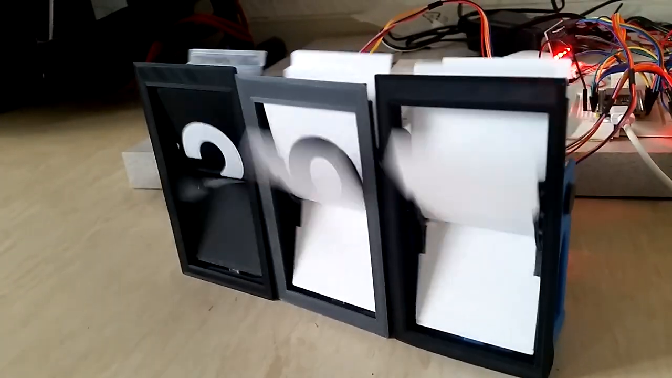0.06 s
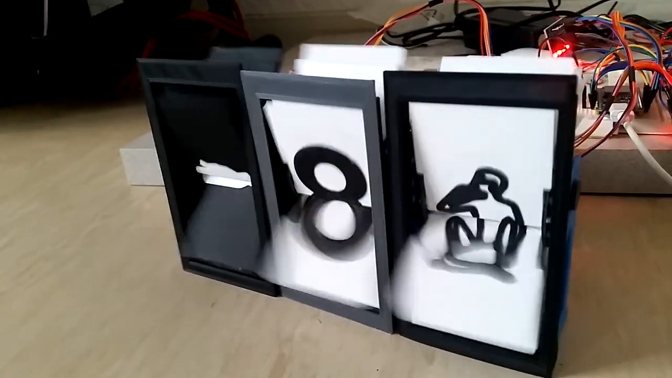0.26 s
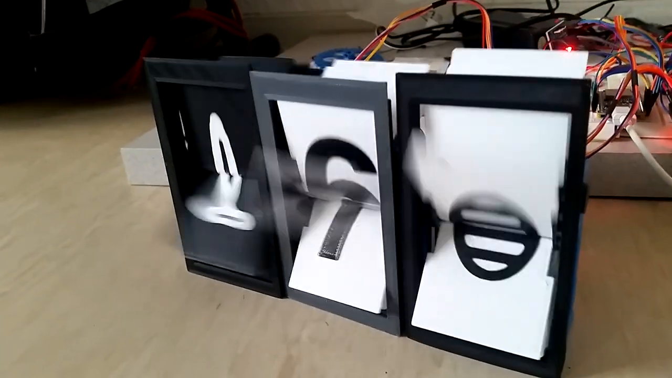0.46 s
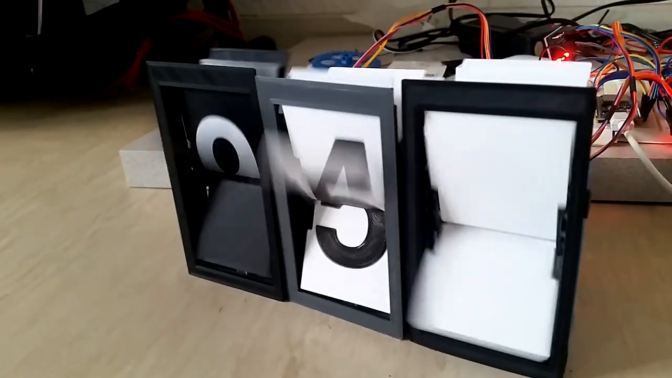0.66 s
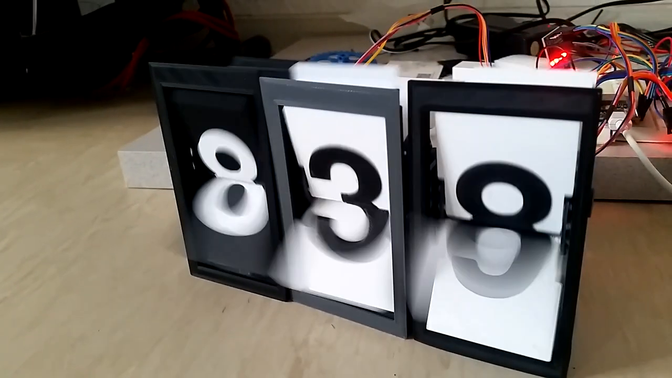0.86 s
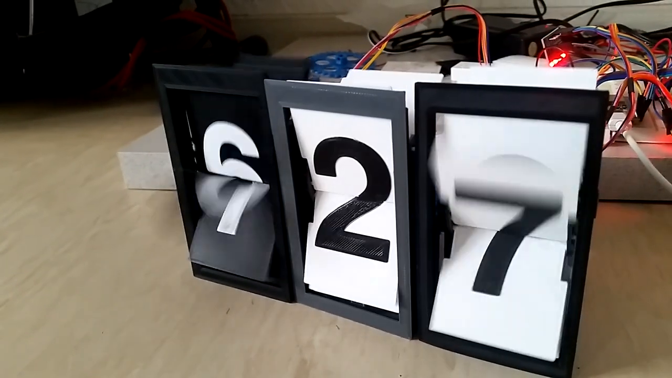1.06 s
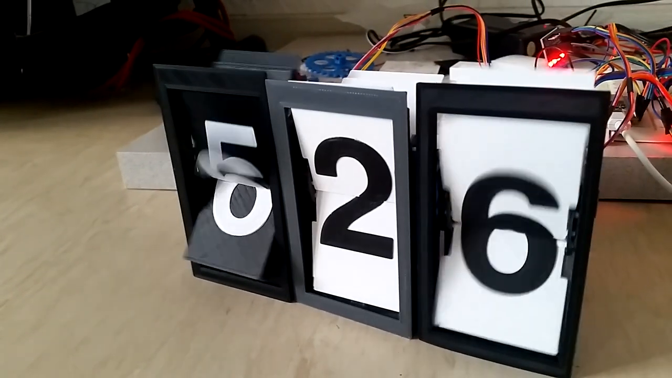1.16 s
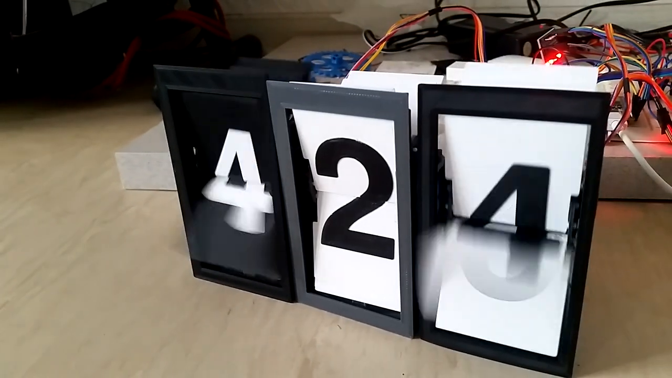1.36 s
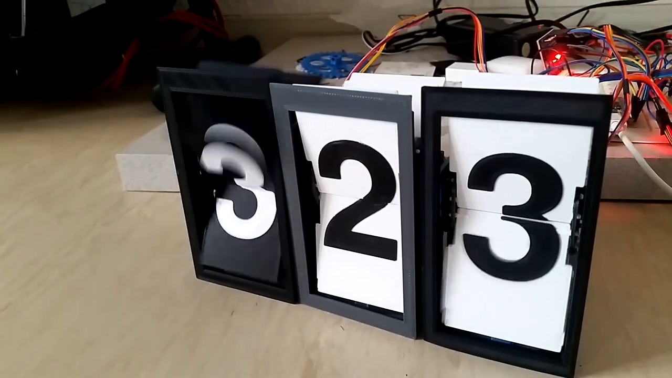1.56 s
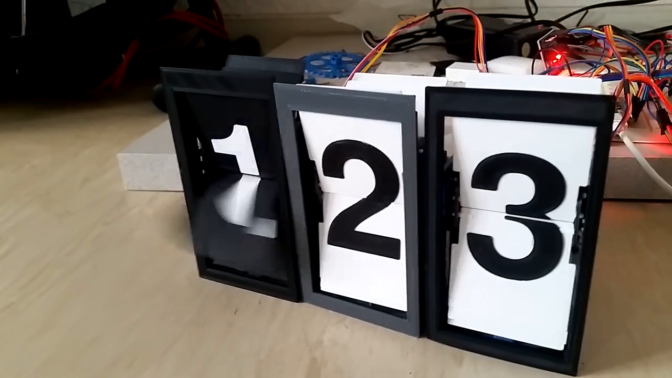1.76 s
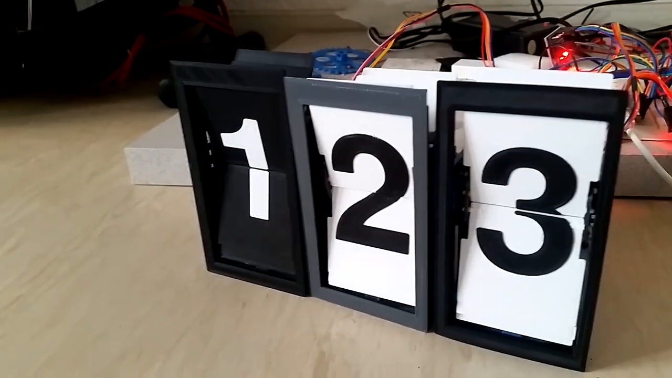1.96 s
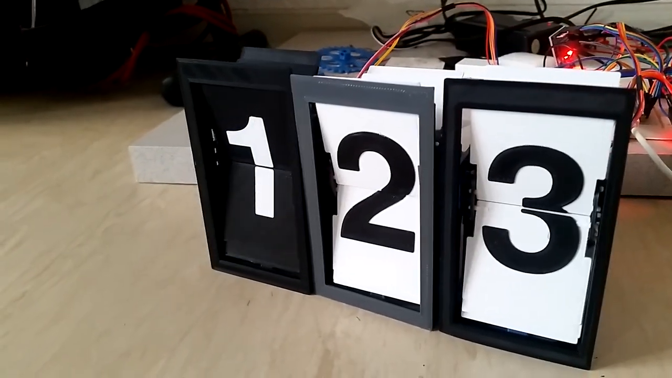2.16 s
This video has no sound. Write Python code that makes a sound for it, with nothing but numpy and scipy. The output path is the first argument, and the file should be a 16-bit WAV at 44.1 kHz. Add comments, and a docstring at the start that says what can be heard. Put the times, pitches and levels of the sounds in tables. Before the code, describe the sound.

Plastic split-flap display drums clatter rapidly, crisp flaps slapping over, thinning to a last few clicks

```python
"""A small room with a table, on which three small split-flap drums spin; their contacts grow weaker.
Flap edges rub past the catches as noise shaped by many tiny random slips. Ticks and slaps are noise bursts
with a sharp attack, a few milliseconds or less of uneven chatter and a quick decay, ringing in the plastic frame.
Each slap adds a low thump. Decaying noise gives the room's echoes, over a faint hum and air noise."""
import sys
import numpy as np
from scipy import signal
from scipy.fft import rfft, irfft
from scipy.io import wavfile

SR = 44100
rng = np.random.default_rng(int(sys.argv[2]) if len(sys.argv) > 2 else 0)


def unload_audio(sound):
    """Save the sound as a 16-bit wav file, at the path given as the first command line argument."""
    columns = np.transpose(np.atleast_2d(sound))
    # keep every value between -1 and 1, then stretch to whole-number steps
    steps = np.round(np.clip(columns, -1, 1) * 32767)
    wavfile.write(sys.argv[1], SR, steps.astype(np.int16))


N = 97020
TIME = np.arange(N) / SR
CONTACT_SAMPLES = 4096
LEAD_S = 0.012  # room ahead of the first touch in each contact sound


def from_db(db):
    """Decibels to gain."""
    return 10 ** (np.asarray(db) / 20)


def colour(x, points):
    """Causal (minimum-phase) filter through the given (Hz, dB) points, built by folding the cepstrum."""
    size = 8192
    hz, db = np.transpose(points)
    freqs = np.maximum(np.arange(size // 2 + 1) * SR / size, 1)
    gain = from_db(np.interp(np.log(freqs), np.log(hz), db))
    cepstrum = irfft(np.log(gain))
    fold = np.r_[1, np.full(size // 2 - 1, 2), 1, np.zeros(size // 2 - 1)]
    impulse = irfft(np.exp(rfft(cepstrum * fold)))
    return signal.fftconvolve(x, impulse)[:N]


def edge(x, hz, kind):
    """Gentle first-order low- or high-pass."""
    sos = signal.butter(1, min(hz, SR / 2 - 1000), kind, fs=SR, output="sos")
    return signal.sosfilt(sos, x + 1e-18)


def tint(x, low_db, treble_db):
    """Shelves on the low mids and the treble, by adding or removing a filtered copy."""
    low_mid_hz, treble_hz = 3000, 7000
    x = x + (from_db(low_db) - 1) * edge(x, low_mid_hz, "low")
    return x + (from_db(treble_db) - 1) * edge(x, treble_hz, "high")


def wobble(count, per_s):
    """Random curve joining per_s normal random points a second, each of spread 1."""
    at = np.arange(count) * per_s / SR
    return np.interp(at, np.arange(count), rng.standard_normal(count))


def spread(pair, width_db=0):
    """Two unrelated signals become left and right: alike in the bass, apart in the treble."""
    # stereo width of diffuse sound: pitch_hz [Hz], side_minus_mid_db [dB]
    widths = [(100, -23), (500, -22), (2000, -7), (4500, -3.5), (7000, -7.5)]
    mid_points = [(hz, -10 * np.log10(1 + from_db(db + width_db) ** 2)) for hz, db in widths]
    side_points = [(hz, -10 * np.log10(1 + from_db(-db - width_db) ** 2)) for hz, db in widths]
    mid = colour(pair[0], mid_points)
    side = colour(pair[1], side_points)
    return np.array([mid + side, mid - side])


def add(out, start_s, sound):
    """Mix a sound in at a time."""
    start = max(int(start_s * SR), 0)
    out[:, start:start + sound.shape[1]] += sound[:, :N - start]


def background():
    """A steady low sine of wavering level, and coloured noise for the air of the room."""
    # spectrum of the room air: pitch_hz [Hz], level_db [dB, relative]
    air_spectrum = [(25, -3.5), (45, 0), (110, -8), (190, -17), (1000, -29.5), (15000, -44)]
    hum_hz, hum_db, hum_waver_db, air_db = 104.3, -66, 4, -34.5
    hum_level = from_db(hum_db + hum_waver_db * wobble(N, per_s=21))
    hum = hum_level * np.sqrt(2) * np.sin(2 * np.pi * hum_hz * TIME)
    air = spread([colour(side, air_spectrum) for side in rng.standard_normal((2, N))])
    return hum + from_db(air_db) * air


def rubbing():
    """Flap edges scrape past the catches: each tiny slip is a decaying grain of noise, over a steady hiss."""
    # loudness of the rubbing: start_s [s], level_db [dB, before the trim below]
    rub_levels = [(0, -25), (.04, -40.5), (.07, -36), (.085, -30), (.13, -34), (.18, -38), (.22, -37),
                  (.31, -29), (.45, -28.5), (.70, -30), (.94, -31), (1.09, -26.5), (1.15, -34.5),
                  (1.31, -33.5), (1.45, -33), (1.54, -40.5), (1.61, -25), (1.73, -35), (1.84, -42),
                  (1.97, -65), (2.04, -35), (2.07, -68), (2.2, -84)]
    trim_db, treble_db, low_cut_hz = 1, -16.5, 56
    slips_per_s, slip_spread_db, hiss_db, grain_t60_s = 650, 3.8, -5.5, 0.006
    slip_happens = rng.random(N) < slips_per_s / SR
    slips = slip_happens * from_db(slip_spread_db * np.minimum(rng.exponential(1, N), 3.5))
    # the grains add up as power, so 60 dB of decay is a factor of a million
    power_decay = from_db(-120 / (grain_t60_s * SR))
    power = signal.lfilter([1], [1, -power_decay], slips ** 2 + 1e-18)
    grain = np.sqrt(power / power.mean() + from_db(hiss_db) ** 2)
    level = from_db(np.interp(TIME, *np.transpose(rub_levels)) + trim_db)
    noise = level * grain * rng.standard_normal((2, N))
    return edge(tint(noise, 0, treble_db), low_cut_hz, "high")


def resonate(x, hz, width_hz, lift_db):
    """A two-pole resonance lifts a narrow band so that it rings."""
    r = np.exp(-np.pi * width_hz / SR)
    numerator = (1 - r * r) / 2 * np.array([1, 0, -1])
    denominator = [1, -2 * r * np.cos(2 * np.pi * hz / SR), r * r]
    band = signal.lfilter(numerator, denominator, x)
    return x + (from_db(lift_db) - 1) * band


def frame(x, share):
    """Flap and frame ring together, randomly detuned on every call; share scales the dB lifts."""
    # resonances of flaps and frame: pitch_hz [Hz, before detuning], width_hz [Hz], lift_db [dB at full share]
    resonances = [(2717, 490, 5), (4220, 290, 7.5), (5260, 140, 5.5), (5670, 250, 2), (8350, 280, 7),
                  (11130, 380, 4.5)]
    detune = 0.03  # spread as a fraction of the pitch
    for hz, width_hz, lift_db in resonances:
        x = resonate(x, hz * (1 + detune * rng.standard_normal()), width_hz, share * lift_db)
    return x


def contact(chatter_s, t60_s, brush):
    """Plastic hits plastic: optional soft brush, sharp touch, uneven chatter, quick decay and a quiver."""
    attack_s, snap_db, snap_s = 0.0001, -3, 0.0006
    flutter_db, flutter_t60_s, brush_s = -13, 0.087, 0.007
    chatter_rough_db, low_cut_hz = 3.2, 330
    t = TIME[:CONTACT_SAMPLES] - LEAD_S
    # the chatter holds its level for chatter_s, then decays; the snap stresses the first touch
    decay = from_db(-60 * np.maximum(t - chatter_s, 0) / t60_s)
    decay = decay * (1 + from_db(snap_db) * np.exp(-abs(t) / snap_s))
    flutter = from_db(flutter_db - 60 * t / flutter_t60_s)
    shape = np.clip(t / attack_s, 0, 1) * np.hypot(decay, flutter)
    # brushing swells up to the touch and fades after it
    shape = shape + brush * np.exp(-abs(t) / brush_s)
    roughness = from_db(chatter_rough_db * wobble(len(t), per_s=914))
    burst = shape * roughness * rng.uniform(-1.06, 1, (2, len(t)))
    # give each side the energy of the shape
    burst = burst * np.sqrt(np.sum(shape ** 2) / np.sum(burst ** 2, axis=1, keepdims=True))
    return frame(edge(burst, low_cut_hz, "high"), 1)


def place(pair):
    """A direct contact is narrower than the room and reaches the left slightly late, by a random lag."""
    narrower_db, longest_lag_us = -4, 34
    left, right = spread(pair, narrower_db)
    hz = np.fft.rfftfreq(len(left), 1 / SR)
    lag_us = rng.uniform(0, longest_lag_us)
    late_left = irfft(rfft(left) * np.exp(-2j * np.pi * hz * lag_us / 1e6), len(left))
    return np.array([late_left, right])


def ticks():
    """A flap slips off its catch or rebounds: a short, light contact with no brushing."""
    # ticks: start_s [s], level_db [dB, before the trim below]
    tick_times = [(.0751, -24.5), (.2063, -23), (.2224, -20.5), (.2702, -20), (.3211, -14), (.3445, -17),
                  (.4812, -19), (.5550, -15), (.6050, -15), (.6185, -15), (.6284, -16.5), (.6868, -20),
                  (.7024, -22), (.7829, -21), (.8573, -21), (.9125, -20), (.9821, -20), (1.0402, -13),
                  (1.0535, -24), (1.1711, -24), (1.2215, -20), (1.2993, -20.5), (1.3603, -21),
                  (1.3764, -18.5), (1.4149, -23), (1.4429, -23), (1.4806, -22.5), (1.5517, -19.5),
                  (1.6041, -24), (1.6470, -14.5), (1.6789, -25), (1.8525, -25), (1.9854, -26),
                  (2.0210, -28.5), (2.0255, -34), (2.0912, -49), (2.1126, -45)]
    trim_db, chatter_s, t60_s = 3.5, 0.00023, 0.012
    out = np.zeros((2, N))
    for start_s, level_db in tick_times:
        tick = tint(contact(chatter_s, t60_s, 0), low_db=-7.5, treble_db=-1.5)
        add(out, start_s - LEAD_S, from_db(level_db + trim_db) * place(tick))
    return out


def thump():
    """The low push of a landing flap on the light frame: one smooth pulse."""
    level_db, peak_s, low_cut_hz = -18, 0.0014, 60
    t = np.maximum(TIME[:CONTACT_SAMPLES] - LEAD_S, 0) / peak_s
    pulse = t * np.exp(1 - t)
    return from_db(level_db) * edge(pulse, low_cut_hz, "high")[None]


def slaps():
    """Flaps land on the stack: a brushing, chattering contact with the flap's own ring, plus a thump."""
    # slaps: start_s [s], level_db [dB, thump and untrimmed slap], chatter_s [s],
    # low_mid_db [dB], treble_db [dB], ring_hz [Hz, the flap's own ring]
    landings = [(0.2099, -11, 0.00062, -0.5, -.5, 2390), (0.2339, -12, 0.0044, -0.5, -3.5, 4220),
                (0.254, -5.5, 0.001, -5.5, -2.5, 5400), (0.3365, -7.5, 0.00062, -6, 0.5, 10400),
                (0.363, -15, 0.0044, -4, 7, 3940), (0.3734, -11, 0.0041, -3.5, 7, 8600),
                (0.469, -6, 0.00052, -2.5, -3, 4140), (.492, -6.5, 0.0019, -7, -5.5, 5100),
                (0.4977, -7.5, 0.0015, -7.5, 1.5, 4100), (0.5687, -13, 0.0076, -1.5, 7, 4270),
                (.612, -11.5, 0.0032, -2.5, 4, 4000), (0.6504, -6.5, 0.0027, -20, 0, 5210),
                (0.7284, -8, 0.0032, -8, -1.5, 2800), (.744, -7, 0.00062, -4, 2, 4070),
                (0.7687, -10.5, 0.00069, 0, 3, 11800), (.8237, -13.5, .0002, -1, 6.5, 9000),
                (.8325, -12, 0.011, -2.5, 2, 4970), (0.8854, -7.5, 0.0038, -16, -13, 4180),
                (0.9624, -10.5, 0.00067, 1, -6, 3250), (0.9671, -12.5, 0.0052, -1, 4, 5800),
                (0.9985, -8.5, 0.0017, -4.5, 1.5, 10200), (1.078, -14, 0.011, -7, -1, 4500),
                (1.102, -9.5, 0.0052, -4, 2.5, 2610), (1.123, -11.5, 0.0051, -5, 0, 13330),
                (1.1975, -12, 0.01, -6.5, 0, 8400), (1.2546, -10, 0.00099, 3, 0.5, 8900),
                (1.3277, -13, 0.0065, -5.5, -3, 5150), (1.3876, -9, 0.003, -6, 2.5, 12000),
                (1.4634, -10.5, .0013, -0.5, 0.5, 5300), (1.501, -16, 0.003, 1, 0.5, 12080),
                (1.619, -11.5, 0.0029, -13, -4, 5190), (1.6542, -18.5, 0.0027, 4.5, -4.5, 5900),
                (1.747, -12.5, 0.003, -3, 5, 7000), (1.7497, -12.5, .0007, -4.5, -7, 4290),
                (1.8795, -16.5, 0.0039, 3, 3.5, 7360)]
    trim_db, t60_s, brush_db = -2, 0.023, -9
    ring_db, ring_width_hz = 5, 380
    out = np.zeros((2, N))
    for start_s, level_db, chatter_s, low_mid_db, treble_db, ring_hz in landings:
        slap = contact(chatter_s, t60_s, from_db(brush_db))
        slap = tint(resonate(slap, ring_hz, ring_width_hz, ring_db), low_mid_db, treble_db)
        add(out, start_s - LEAD_S, from_db(level_db + trim_db) * place(slap))
        # the push starts halfway through the chatter
        add(out, start_s - LEAD_S + chatter_s / 2, from_db(level_db) * thump())
    return out


def reflections(x, t60_s, build_s):
    """Dense echoes that build up and die away: convolution with decaying noise of unit energy."""
    t = TIME[:SR // 2]
    tail = rng.standard_normal((2, len(t))) * from_db(-60 * t / t60_s)
    tail = tail * np.minimum(t / build_s, 1) ** 2
    tail = tail / np.sqrt(np.sum(tail ** 2, axis=1, keepdims=True))
    return signal.fftconvolve(x, tail, axes=1)[:, :N]


def scene():
    """Rubbing, ticks and slaps share one colour and one small room; hum and air lie underneath."""
    # filter on all contacts: pitch_hz [Hz], level_db [dB, before the direct level]
    contact_colour = [(60, -4.5), (200, -3), (450, -6.5), (1200, -4.5), (2000, 0), (3400, -2.5),
                      (5000, 1.5), (7200, -3.5), (10000, -2.5), (13000, 0.5), (15600, -6)]
    direct_db, rub_ring_share, right_louder_db = -2.5, 0.5, 0.24
    room_db, room_t60_s, room_build_s, room_top_hz = -11, 0.2, 0.0069, 9150
    contacts = spread(frame(rubbing(), rub_ring_share)) + ticks() + slaps()
    direct = from_db(direct_db) * np.array([colour(side, contact_colour) for side in contacts])
    echoes = edge(reflections(direct, room_t60_s, room_build_s), room_top_hz, "low")
    room = from_db(room_db) * spread(echoes)
    balance = from_db([[-right_louder_db / 2], [right_louder_db / 2]])
    return (direct + room) * balance + background()


def record(dry):
    """Soft saturation rounds the highest peaks, then a steep low-pass cuts the top."""
    cutoff_hz = 15900
    rounded = dry / (1 + dry ** 6) ** (1 / 6)
    return signal.sosfilt(signal.ellip(10, 0.2, 70, cutoff_hz, fs=SR, output="sos"), rounded)


dry = scene()
out = record(dry)
unload_audio(out)
```